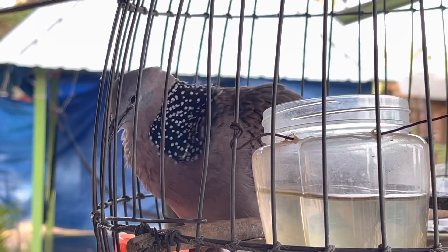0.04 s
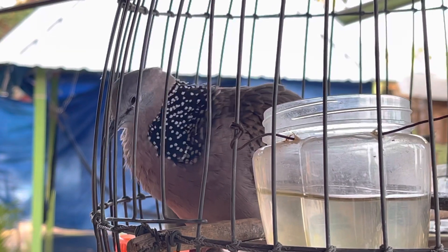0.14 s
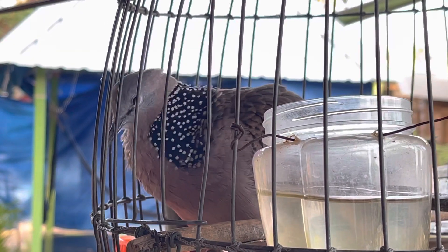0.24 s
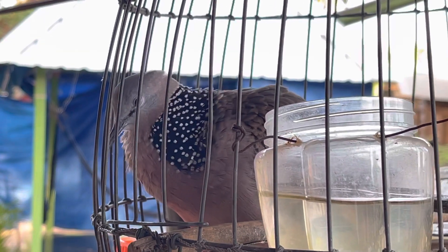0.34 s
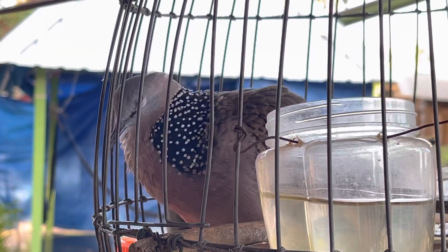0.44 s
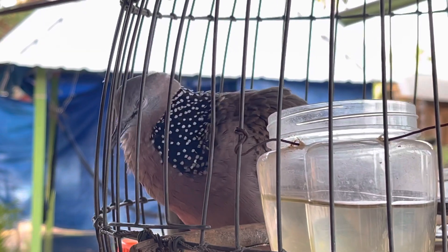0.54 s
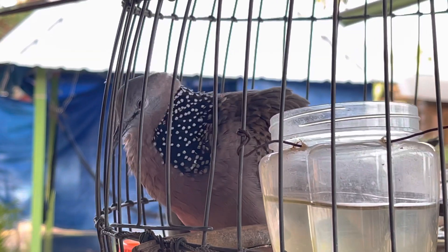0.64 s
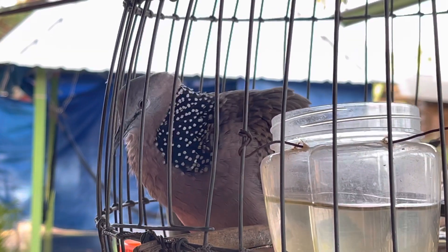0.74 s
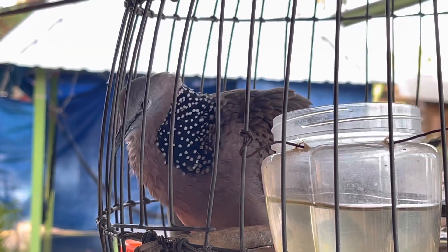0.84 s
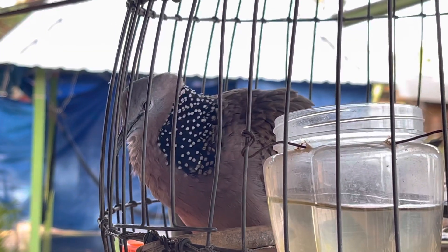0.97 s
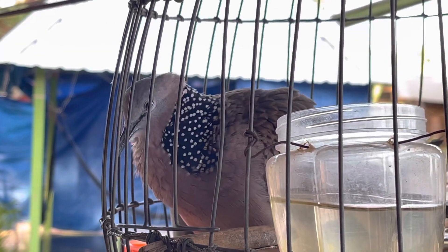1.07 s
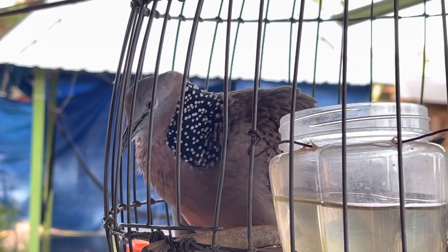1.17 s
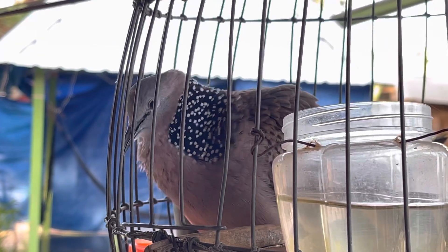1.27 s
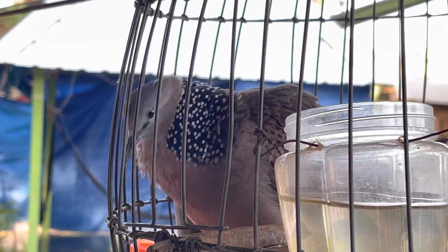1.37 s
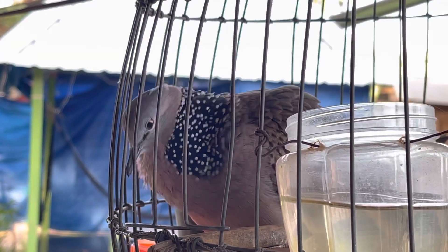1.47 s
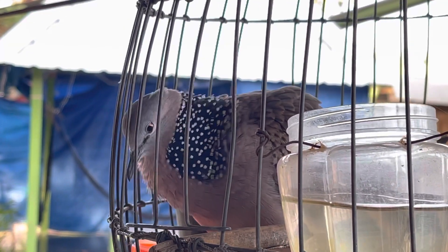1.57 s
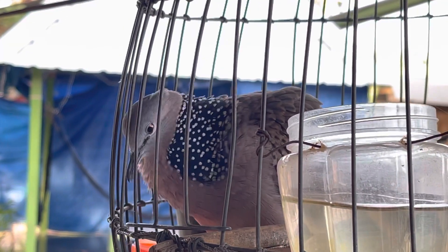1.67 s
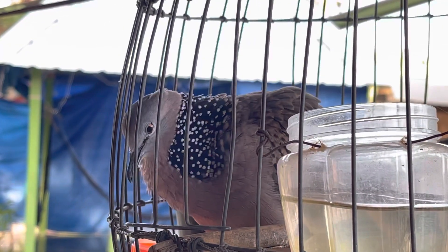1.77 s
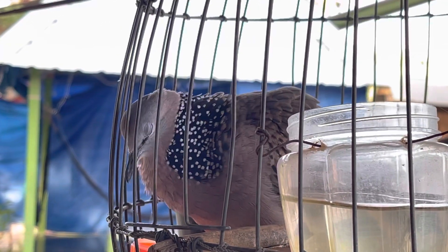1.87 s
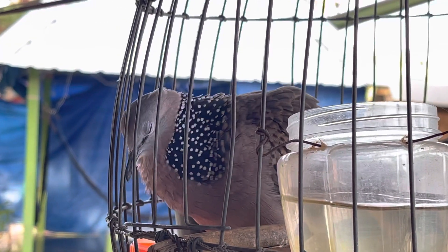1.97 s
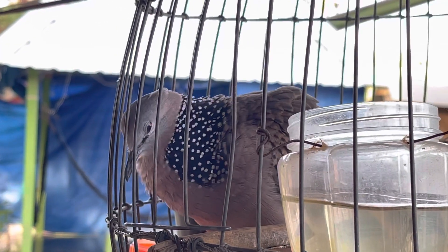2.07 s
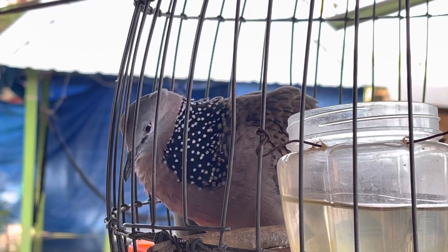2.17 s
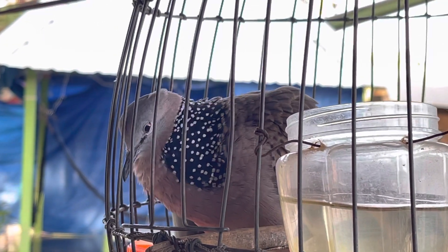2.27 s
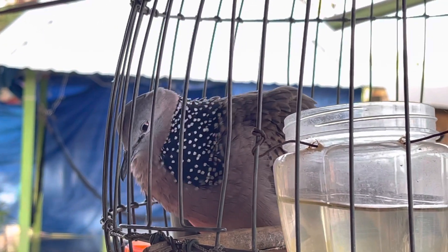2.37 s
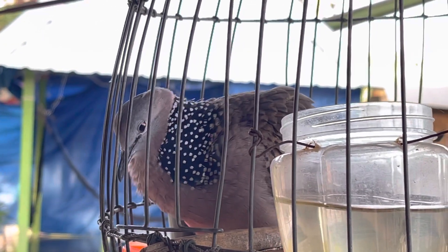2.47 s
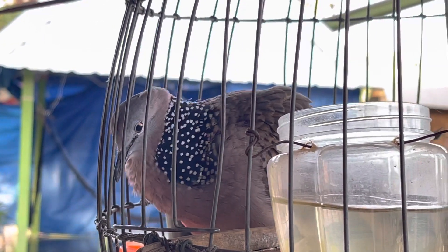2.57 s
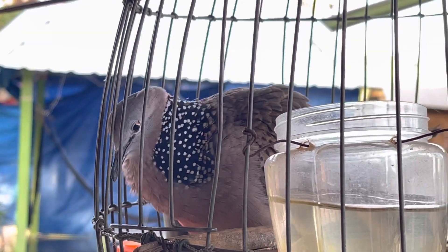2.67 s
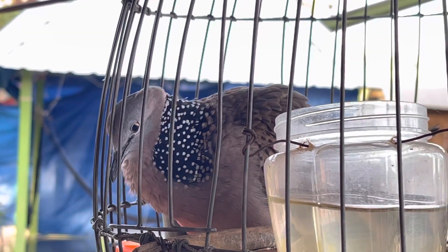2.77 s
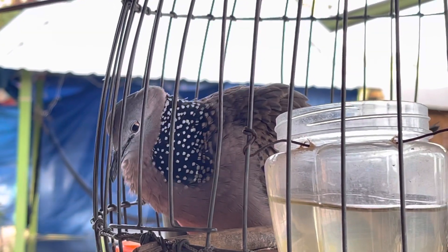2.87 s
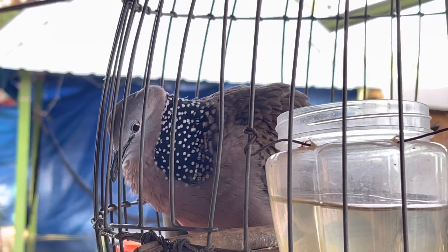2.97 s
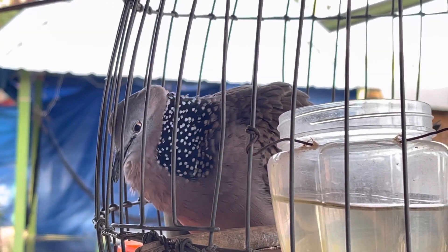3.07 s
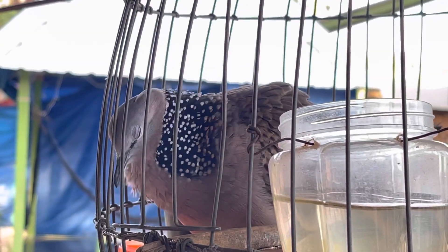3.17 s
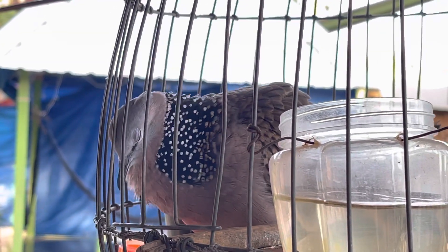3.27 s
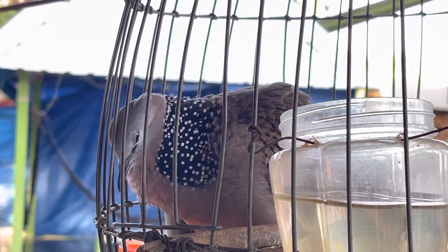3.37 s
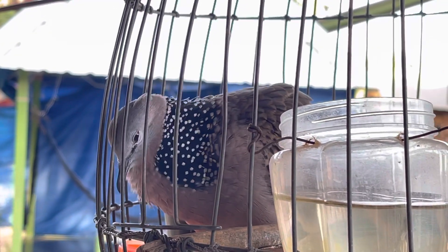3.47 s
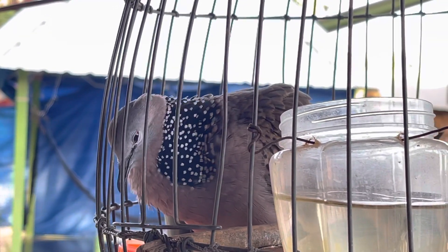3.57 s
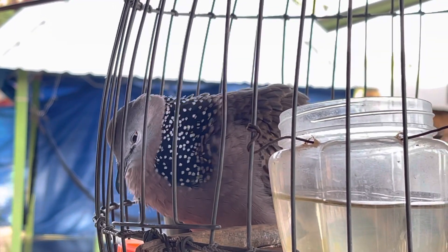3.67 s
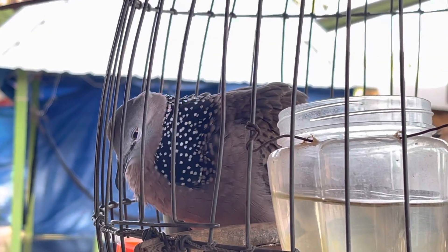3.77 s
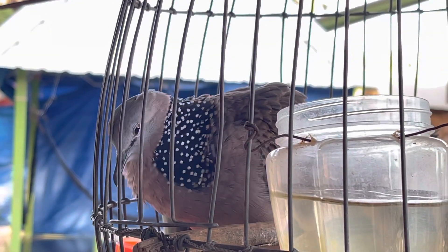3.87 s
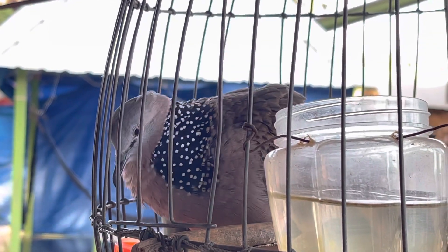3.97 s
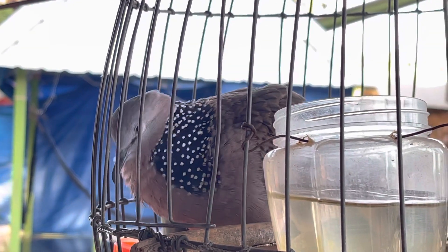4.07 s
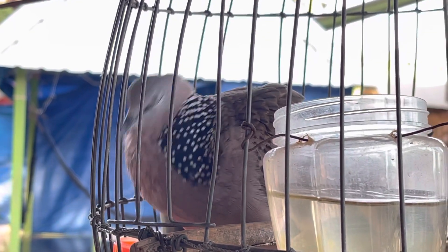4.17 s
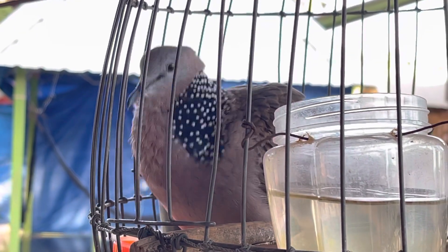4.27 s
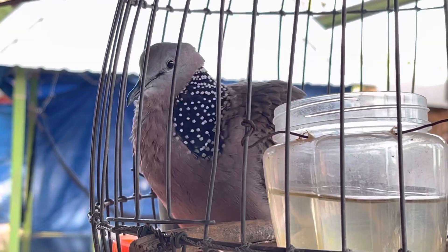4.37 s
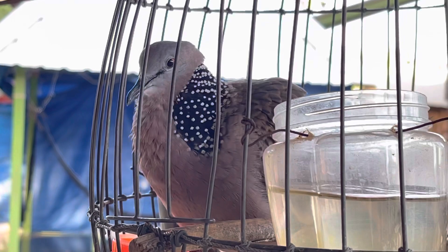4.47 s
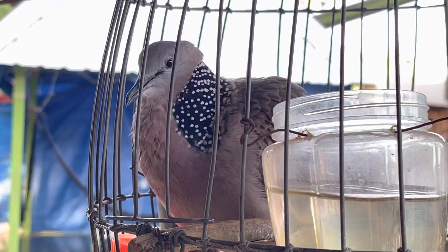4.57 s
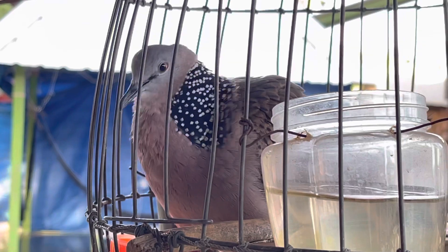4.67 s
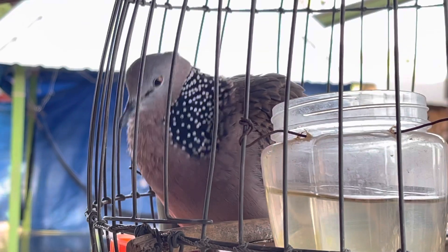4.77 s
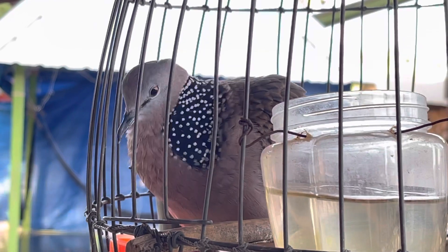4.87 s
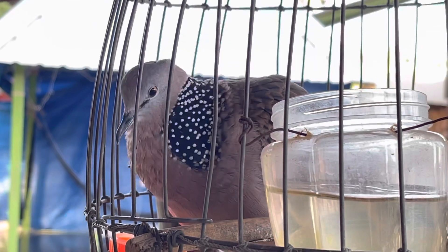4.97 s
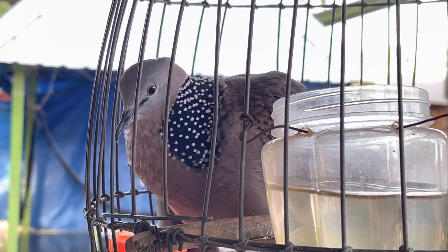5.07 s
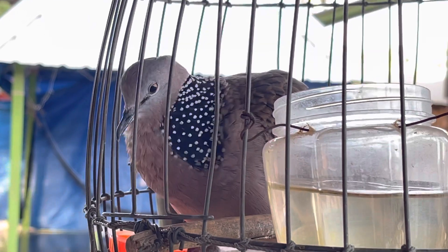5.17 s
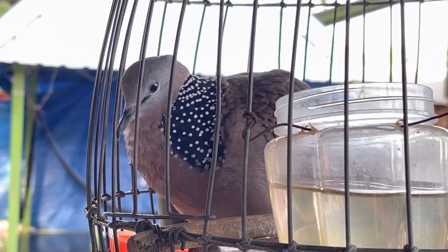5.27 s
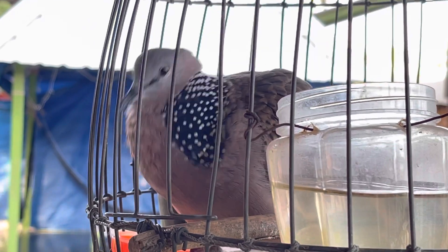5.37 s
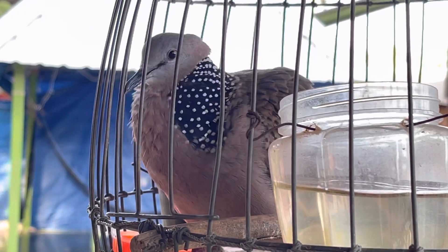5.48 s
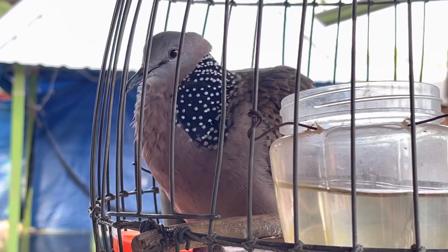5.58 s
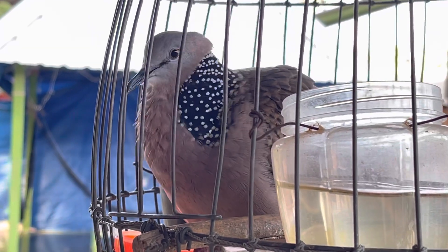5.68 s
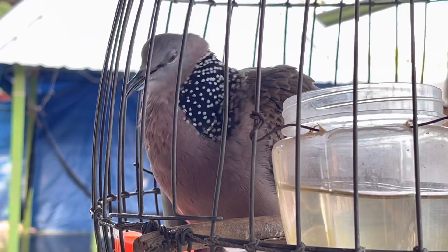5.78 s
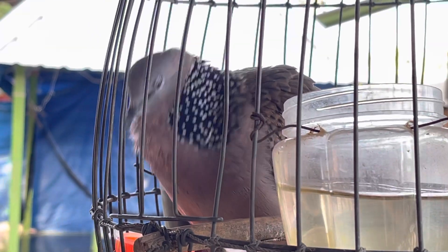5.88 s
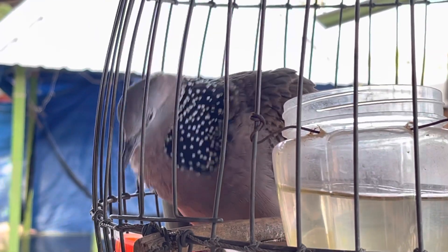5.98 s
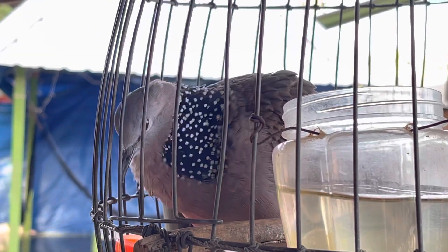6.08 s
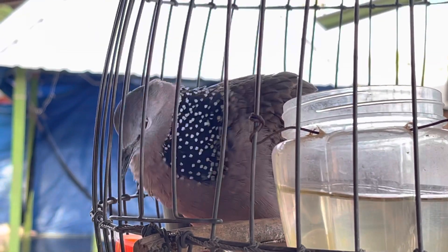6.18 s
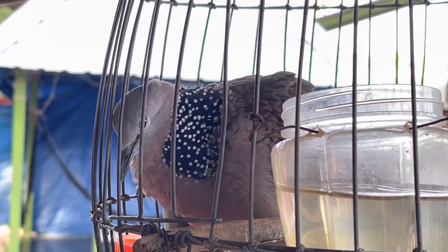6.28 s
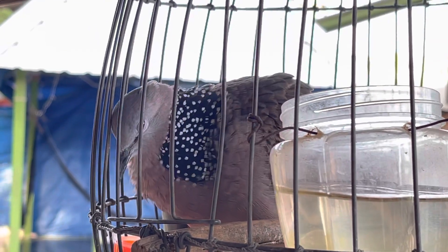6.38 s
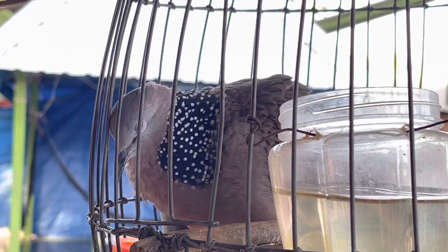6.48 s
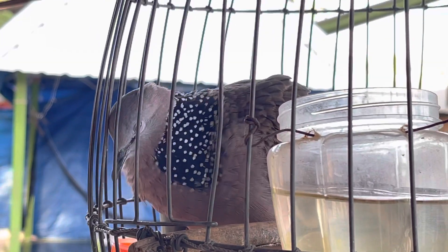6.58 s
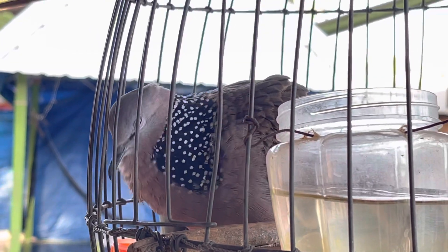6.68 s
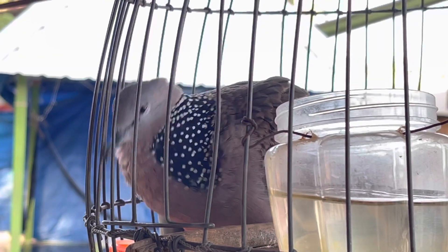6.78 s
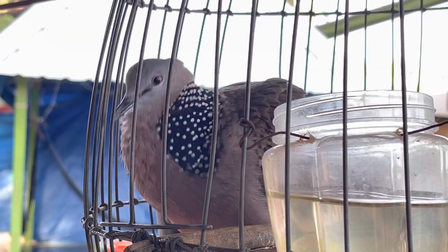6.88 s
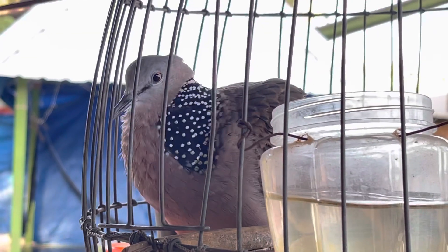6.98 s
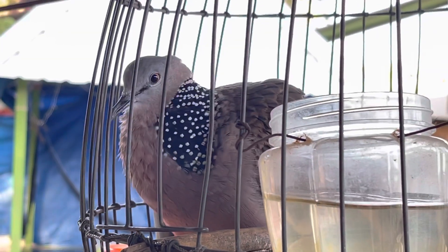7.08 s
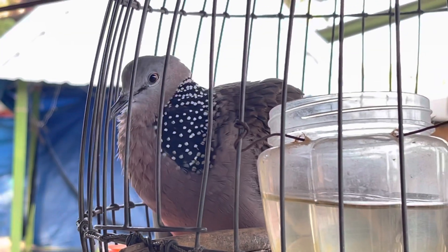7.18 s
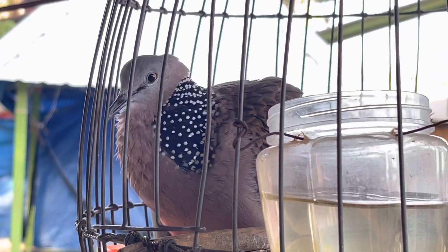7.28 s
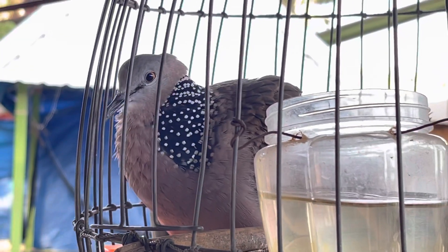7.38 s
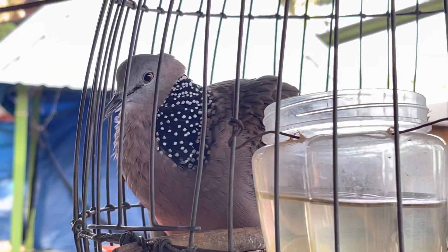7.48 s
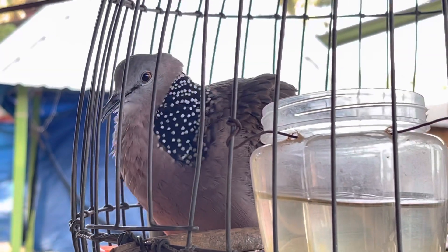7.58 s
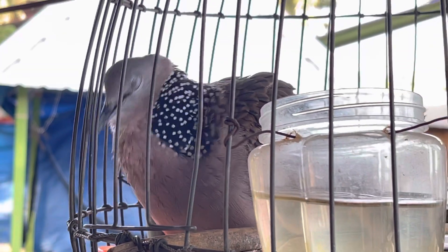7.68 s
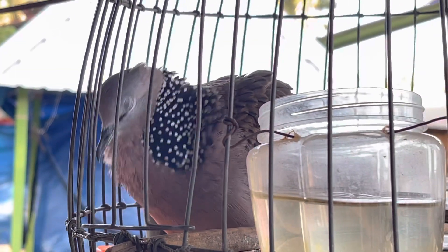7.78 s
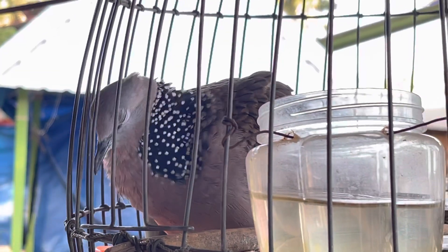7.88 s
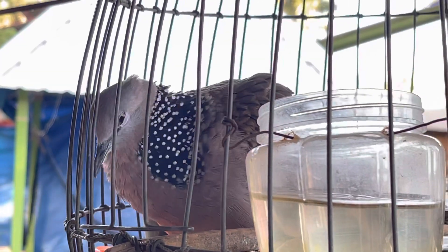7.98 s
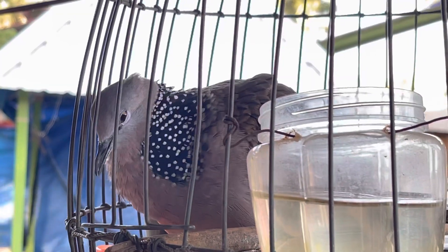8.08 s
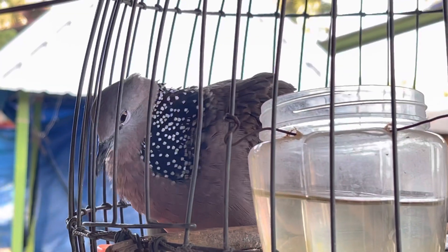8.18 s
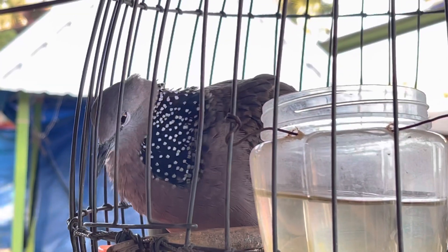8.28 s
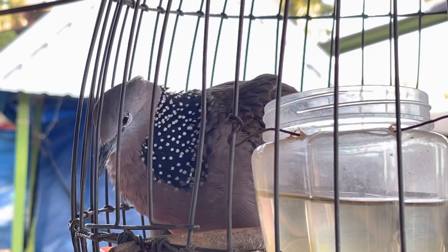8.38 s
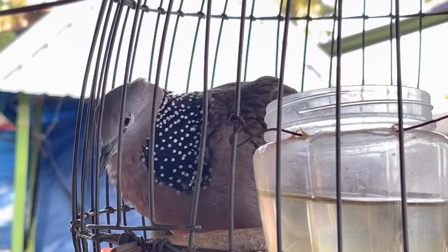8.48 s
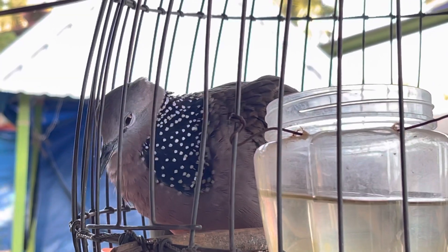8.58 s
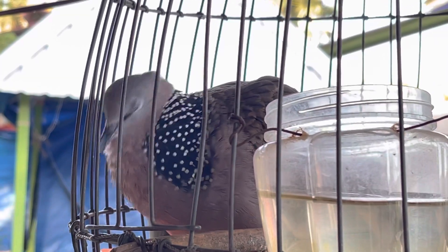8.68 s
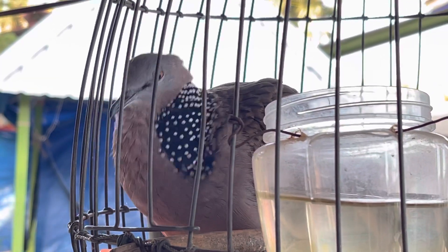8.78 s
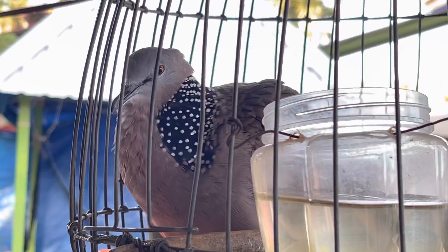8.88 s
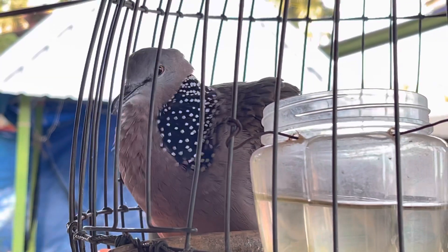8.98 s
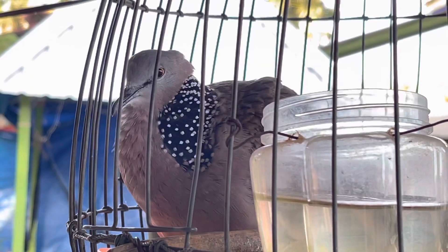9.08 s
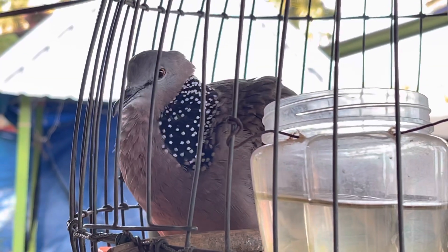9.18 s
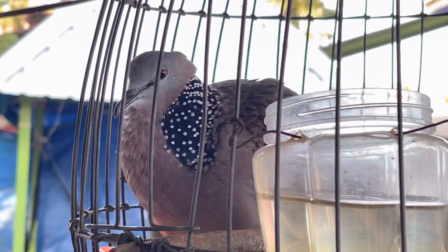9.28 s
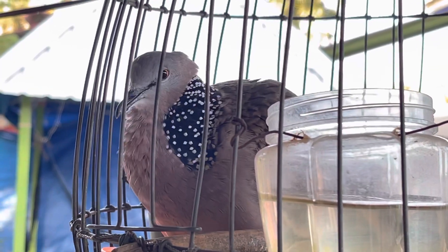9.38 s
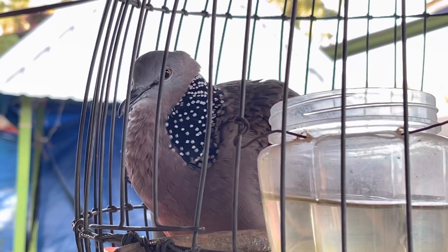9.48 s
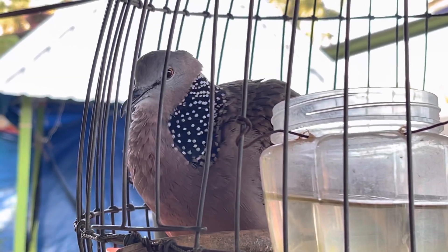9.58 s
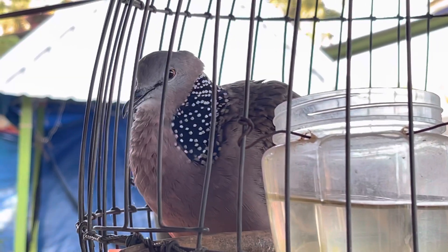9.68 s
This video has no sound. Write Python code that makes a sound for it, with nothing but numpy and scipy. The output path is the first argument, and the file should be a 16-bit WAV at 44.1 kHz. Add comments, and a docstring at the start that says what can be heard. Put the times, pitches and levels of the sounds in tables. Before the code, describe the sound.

A spotted dove coos very close: a short double coo with a purring dip, then a longer rolled coo, repeated with brief gaps for nearly ten seconds. At the start a second dove overlaps from further away, slightly higher and more echoing. A small bird tweets faintly mid-way. Soft air and a low distant engine lie beneath, in an open yard shelter.

```python
"""A caged spotted dove coos six phrases close to the microphone, under an open shelter.
Its syrinx sings a near sine that catches in quick rolls; the inflated crop rings at each catch.
A second dove answers further off, made the same way; small birds chirp and a distant dove coos in plain sines.
An engine idles far away as a few low orders; filtered noise makes the air, soft rustles and low bumps."""
import sys
import numpy as np
from scipy import signal
from scipy.fft import rfft, irfft, next_fast_len
from scipy.io import wavfile
from scipy.ndimage import uniform_filter1d

SR = 44100
rng = np.random.default_rng(int(sys.argv[2]) if len(sys.argv) > 2 else 0)


def dump_mix(stems):
    """Bounce the given channels to the path in sys.argv[1] as a 16-bit WAV at rate SR."""
    frames = np.atleast_2d(stems).T  # one column per channel
    limited = np.clip(frames, -1, 1)  # hard clip at full scale
    pcm = np.round(limited * 32767).astype(np.int16)
    wavfile.write(sys.argv[1], SR, pcm)


N = 429534
TIME = np.arange(N) / SR

# every near coo scoops up from a low pitch and drops again as the air is shut off
ONSET_HZ, RISE_S = 428.6, 0.019
CLOSING_HZ, FALL_S = 465.6, 0.012
# a long coo sags ever faster; its roll starts once the pitch is up
SAG_POWER, ROLL_DELAY_S = 3.3, .035
# double coo: the first swell peaks after the start, the second before the end; the purr clears near the end
FIRST_PEAK_S, FIRST_WIDTH_S = .039, .027
SECOND_PEAK_S, SECOND_WIDTH_S, CLEAR_S = .035, .056, .048
# the harder a catch, the likelier that the next one is missed (chance per cycle lost)
MISS_CHANCE = .09
# resonance of the crop, then the cutoff of the neck skin
CROP_HZ, CROP_WIDTH_HZ, SKIN_HZ = 590, 108, 744
# where the doves sit: left minus right in dB, and the phase by which the left ear leads in radians
NEAR_PAN_DB, NEAR_LEAD = 0.97, .28
FAR_PAN_DB, FAR_LEAD = 2.5, 1.1
# gain into the echoes, from the shelter and from the wall
NEAR_ROOM_DB, FAR_ROOM_DB, BIRDS_ROOM_DB = -27, -6.5, -4.5
NEAR_WALL_DB, FAR_WALL_DB = -40.5, -20


def undb(db):
    """Decibels to gain."""
    return 10 ** (np.asarray(db) / 20)


def level(x, db):
    """Set the rms level over the whole scene."""
    return x * undb(db) / np.sqrt(np.mean(x ** 2))


def noise():
    """White noise."""
    return rng.standard_normal(N)


def resonate(x, hz, width_hz):
    """One resonance with gain 1 at its centre."""
    b, a = signal.iirpeak(hz, hz / min(width_hz, SR / 3), fs=SR)
    return signal.lfilter(b, a, x + 1e-18)


def resonate_twice(x, hz, width_hz):
    """Two equal resonances in a row, for steeper skirts."""
    return resonate(resonate(x, hz, width_hz), hz, width_hz)


def lowpass(x, hz, order=2):
    """Smooth low-pass."""
    return signal.sosfilt(signal.butter(order, hz, fs=SR, output="sos"), x + 1e-18)


def colour(x, points):
    """Filter by a curve of (frequency [Hz], gain [dB]) points."""
    hz, db = np.transpose(points)
    size = next_fast_len(N)
    bins = np.maximum(np.fft.rfftfreq(size, 1 / SR), 1)
    gain = undb(np.interp(np.log(bins), np.log(hz), db))
    return irfft(rfft(x, size) * gain, size)[:N]


def walk(rate):
    """Random wander with a spread near 1: straight lines between `rate` random points per second."""
    return np.interp(TIME * rate, np.arange(8192), rng.standard_normal(8192))


def bell(x):
    """A smooth swell, 1 at zero."""
    return np.exp(-np.minimum(x ** 2, 50))


def burst(start, attack, decay):
    """Quick rise and exponential fall."""
    age = np.maximum(TIME - start, 0)
    return np.minimum(age / attack, 1) * np.exp(-np.minimum(age / decay, 20))


def pan(x, db):
    """Place a sound, left minus right in dB."""
    return x * undb(np.array([[db], [-db]]) / 2)


def place(x, db, lead):
    """Pan a sound and let it reach the left ear a little ahead in phase."""
    turn = np.exp(.5j * lead * np.array([[1], [-1]]))
    turned = signal.hilbert(x, next_fast_len(N))[:N] * turn
    return pan(turned.real, db)


def shelter(x, t60=.6, build_up_s=.025):
    """Diffuse echo of the roof and yard: decaying noise tails, partly alike in both ears."""
    t = np.arange(SR) / SR
    envelope = np.exp(-np.log(1000) * t / t60) * np.minimum(t / build_up_s, 1) ** 2
    mid, side = rng.standard_normal((2, SR)) * envelope
    tails = np.array([mid + .5 * side, mid - .5 * side])
    tails /= np.sqrt(np.sum(tails ** 2) / 2)
    return signal.fftconvolve(x[None], tails, axes=1)[:, :N]


def wall_echo(x, delay_s=0.15):
    """One late return from a wall across the yard."""
    return np.interp(TIME - delay_s, TIME, x, left=0)


def air(swell=0.96, flicker_db=3.0):
    """Outdoor air: low rumble under a wide hiss whose treble swells, sinks and flickers."""
    # course of the treble, used relative to its median and scaled by swell: (time [s], level [dB])
    hiss_course = [(0.0, -64.5), (0.21, -66), (0.48, -66.5), (1.3, -59), (3.46, -62.5), (3.62, -58.5),
                   (4.0, -63.5), (6.32, -68.5), (6.51, -65.5), (6.67, -68), (7.56, -63.5), (7.75, -59.5),
                   (7.94, -58.5), (9.7, -66.5)]
    # spectrum of the air before its level is set: (frequency [Hz], relative level [dB])
    air_curve = [(110, -21.5), (200, -7), (300, -8), (600, -11), (1300, -18.5), (2500, -20.5),
                 (4000, -25.5), (6300, -26.5), (8800, -19.5), (11400, -25.5), (13000, -49)]
    # spectrum of the rumble before its level is set: (frequency [Hz], relative level [dB])
    rumble_curve = [(20, -37), (38, -6), (55, -0.5), (85, 0.5), (130, -7), (240, -22), (500, -63.5)]
    # course of the rumble, around which it wanders: (time [s], level [dB])
    rumble_course = [(0, -50), (6.7, -49.5), (7.2, -45), (7.5, -53.5), (8.3, -52), (9.7, -48)]
    # width of the air: (frequency [Hz], side minus mid [dB])
    width_curve = [(200, -9), (600, -5), (1100, 4), (2200, -5), (4500, -11), (6500, -23.5), (8500, -13),
                   (9800, 12.5), (11500, -15.5)]

    s, db = np.transpose(hiss_course)
    gain = undb(swell * (np.interp(TIME, s, db) - np.median(db)) - 0.8 + flicker_db * walk(16))
    mid, other = (level(colour(noise(), air_curve), -56) for _ in range(2))
    low, other_low = (colour(v, [(1200, -0.5), (3000, -16.0)]) for v in (mid, other))
    treble = (mid - low) * gain
    # treble reaches the two ports out of phase; lower sounds come from all around
    quarter_turned = np.imag(signal.hilbert(treble, next_fast_len(N)))[:N]
    side = colour(other_low + quarter_turned, width_curve)
    heave = undb(np.interp(TIME, *np.transpose(rumble_course)) + 1.2 * walk(4.5))
    rumble, rumble_side = (heave * level(colour(noise(), rumble_curve), 0) for _ in range(2))
    side = side + undb(-12) * rumble_side
    return low + treble + rumble + np.array([side, -side])


def engine(unsteady_db=2):
    """Only the low orders of a slow idle carry this far, each wandering in level."""
    # idling engine: (time [s], base rate [1/s], level [dB])
    idle = [(0, 18.9, -44.5), (.8, 18.7, -51.5), (2.001, 19, -44.5), (2.801, 18.5, -47.5),
            (4.101, 18.3, -48.5), (4.702, 18, -54), (9.701, 16, -61)]
    # its exhaust orders: (multiple of the base rate, relative level [dB])
    exhaust = [(2, -13), (3, -19), (4, -7), (5, 0), (6, -5), (7, -6), (8, -15), (9, -16.5)]

    s, rate, db = np.transpose(idle)
    turn = np.cumsum(np.interp(TIME, s, rate)) / SR
    hum = np.zeros(N)
    for k, order_db in exhaust:
        strength = undb(order_db + unsteady_db * walk(7.1))
        hum += strength * np.sin(2 * np.pi * (np.round(k) * turn + rng.random()))
    return level(hum, 0) * undb(np.interp(TIME, s, db))


def bumps(width_hz=75, decay_s=0.051):
    """Dull, quickly damped thuds on the microphone, cut from low resonant noise."""
    # low bumps: (time [s], centre [Hz], noise level before the envelope [dB])
    thuds = [(6.972, 68, -43), (7.234, 72.5, -38), (8.433, 97.3, -36), (8.864, 113, -38.5),
             (8.959, 104, -37.5), (9.029, 106, -39), (9.329, 100, -42)]
    push, out = noise(), np.zeros(N)
    for start, hz, db in thuds:
        thud = resonate(resonate(push, hz, width_hz), hz, 2 * width_hz)
        out += level(thud, db) * burst(start, 0.0083, decay_s)
    return out


def rustles(grain_db=2):
    """Short grainy brushes: band-passed noise with a quick rise and a decay."""
    # soft rustles: (time [s], decay [s], centre [Hz], width of each filter pass [Hz],
    # noise level before the envelope [dB])
    brushes = [(.805, 0.068, 9000, 6000, -47), (0.811, 0.063, 3000, 5140, -49.5),
               (2.844, 0.053, 2400, 1802, -46.5), (3.401, .17, 2400, 3020, -49.5),
               (4.67, 0.69, 1995, 1582, -60), (5.86, 0.14, 3360, 3645, -58), (7.05, 0.09, 5000, 6930, -59)]
    grains, out = noise() * undb(grain_db * walk(270)), np.zeros(N)
    for start, decay, hz, width, db in brushes:
        out += level(resonate_twice(grains, hz, width), db) * burst(start, 0.0045, decay)
    return out


def other_birds(warble=0.015):
    """Thin sine notes: tweets that sweep up and level off, gliding or held whistles, two distant coos."""
    # a small bird repeats one upward tweet: (time [s], length [s], peak level [dB])
    tweets = [(5.62, .05, -60.5), (5.866, 0.057, -52.5), (6.11, 0.057, -57), (6.352, .075, -59.5),
              (6.594, 0.072, -60)]
    # stray whistles, and at the end two faint coos of a distant dove:
    # (time [s], length [s], start pitch [Hz], end pitch [Hz], peak level [dB])
    glides = [ (0.119, .2, 9300, 8200, -65), (1.224, .44, 1436, 1420, -62), (4.229, 0.054, 3600, 3760, -69),
              (5.352, .11, 2580, 2580, -62.5), (5.8, .33, 1484, 1522, -61.5), (7.21, .22, 1703, 1712, -66),
              (6.764, 0.047, 5450, 4430, -66), (8.806, .067, 6580, 7150, -61),
              (8.998, 0.086, 7200, 6850, -64), (9.204, 0.26, 584, 571, -57), (9.562, 0.24, 580, 585, -55)]
    from_hz, to_hz, rise_s = 1950, 2630, .018  # the tweet's sweep

    notes = []
    for start, length, db in tweets:
        age = np.arange(int(length * SR)) / SR
        notes.append((start, to_hz + (from_hz - to_hz) * bell(age / rise_s), db))
    for start, length, start_hz, end_hz, db in glides:
        notes.append((start, np.linspace(start_hz, end_hz, int(length * SR)), db))

    out, wobble = np.zeros(N), 1 + warble * walk(270)
    for start, hz, db in notes:
        span = np.minimum(int(start * SR) + np.arange(len(hz)), N - 1)
        arch = np.sqrt(np.abs(np.sin(np.linspace(0, np.pi, len(hz)))))
        phase = 2 * np.pi * np.cumsum(hz * wobble[span]) / SR
        out[span] += undb(db) * arch * np.sin(phase)
    return out


def catches(rolls, pitch, law):
    """Each catch briefly slackens the syrinx: returns the pitch sag in Hz and the choking of the tone."""
    spread_s, jitter, scatter, rebound = .0023, .11, .24, .17
    law_hz, rates, slips = np.transpose(law)
    sag, choke = np.zeros(N), np.zeros(N)
    for due, end in rolls:
        for late, more, luck in zip(*rng.standard_normal((2, 64)), rng.random(64)):
            if due >= end:
                break
            rate, slip = (np.interp(pitch[int(due * SR)], law_hz, v) for v in (rates, slips))
            at = due + jitter * late / rate
            near = slice(int(at * SR) - 700, int(at * SR) + 700)
            u = (TIME[near] - at) / spread_s
            slack = np.exp(-.5 * u ** 2)
            lost = slip * np.exp(scatter * more)  # cycles
            sag[near] += lost * slack / (spread_s * np.sqrt(2 * np.pi))
            # the dammed air pushes harder just after the catch
            choke[near] += np.sqrt(lost) * (slack ** 2 - rebound * np.exp(-.5 * (u - 2) ** 2))
            missed = luck < MISS_CHANCE * lost
            due += (2 if missed else 1) / rate
    return sag, choke


def dove(coos, rolls, roll_law, effort, edge_s=0.00053, waver=0.0058, husk_db=-46.5, hiss_db=-64):
    """A near sine from the syrinx, sung with closed beak through the crop and the skin of the neck."""
    # faint overtones that leak past the crop: (multiple of the pitch, level against the syrinx [dB])
    leaks = [(2, -51), (3, -59), (4, -65), (7, -66), (8, -59.5), (9, -58), (13, -68)]

    times, pitches, levels = np.hstack(coos)
    pitch, strength_db = np.interp(TIME, times, pitches), np.interp(TIME, times, levels)
    sounding = sum((TIME >= s[0]) & (TIME <= s[-1]) for s, _, _ in coos)
    gate = uniform_filter1d(sounding * 1., int(edge_s * SR))
    sag, choke = catches(rolls, pitch, roll_law)
    force = undb(strength_db + np.interp(pitch, *np.transpose(effort))) * gate
    swing = force * np.exp(-2 * choke)
    phase = 2 * np.pi * np.cumsum(pitch * (1 + waver * walk(180)) - sag) / SR
    crop = resonate(swing * np.sin(phase), CROP_HZ, CROP_WIDTH_HZ)
    tone = lowpass(crop, SKIN_HZ, order=6)
    # overtones only appear at the top of the range, where the membranes are driven hard
    strain = np.clip((pitch - 610) / 60, 0, 1)
    overtones = strain * swing * sum(undb(db) * np.sin(np.round(k) * phase) for k, db in leaks)
    # a husky breath puffs up around each catch
    husk = level(resonate_twice(noise(), 1000, 220), husk_db) * force * (0.6 + 1.2 * np.abs(choke))
    # a trace of hiss goes with the voice
    hiss = level(resonate_twice(noise(), 4300, 4000), hiss_db) * force
    return tone + overtones + husk + hiss


def far_song():
    """The further dove's coos, with no level offsets between them, and its rolls."""
    # one table per coo: (time [s], pitch [Hz])
    answers = [
        [(0, 780), (.07, 743), (.35, 736.3), (.73, 696), (.8, 603), (.87, 490)],
        [(1.06, 462), (1.1, 635), (1.13, 734), (1.2, 723), (1.25, 602), (1.295, 426)],
    ]
    # its rolls; one whose end is not after its start holds no catch: (start [s], end [s])
    answer_rolls = [(0.101, 0.74), (1.091, 1.09), (1.22, 1.28)]
    return [(*np.transpose(coo), np.zeros(len(coo))) for coo in answers], answer_rolls


def scoop(held_hz, age, length):
    """Pitch rises into the coo and falls out of it."""
    hz = held_hz + (ONSET_HZ - held_hz) * bell(age / RISE_S)
    return CLOSING_HZ + (hz - CLOSING_HZ) * np.minimum((length - age) / FALL_S, 1)


def near_song():
    """The near dove's coos as (times, pitches, levels), and its rolls as (start, end)."""
    # long coos open with a roll, clear, and relapse once; roll times count from the coo's start:
    # (time [s], length [s], top pitch [Hz], sag by the end [Hz], roll end [s], relapse start [s],
    # relapse length [s], level offset [dB])
    long_coos = [ (.053, .376, 697, 42.15, 0.25, .275, .058, 1.0),
                 (1.786, 0.41, 695.8, 49.8, 0.14, 0.24, .005, 0.56),
                 (3.602, 0.4, 689.6, 55.05, 0.24, 0.29, .02, -0.2),
                 (4.969, 0.28, 668.8, 149, 0.1, 0.15, .115, 0.7),
                 (6.287, .404, 691.8, 55.6, .207, .257, .066, -0.17),
                 (8.135, 0.42, 688.5, 49.56, 0.23, 0.32, .005, -0.2)]
    # double coos, two swells joined by a low purr; the roll time counts from the coo's start:
    # (time [s], length [s], first swell [Hz], purr [Hz], second swell [Hz], roll start [s],
    # level offset [dB])
    double_coos = [ (1.304, .275, 645.8, 450, 652.6, .043, 0.25),
                   (3.117, 0.28, 663, 445, 657.4, 0.057, 0.76), (4.661, 0.2, 672.3, 600, 658.4, 0.045, 0),
                   (5.792, .285, 635, 450, 648, .031, 0.74), (7.655, 0.28, 620.6, 452, 665, .036, 0.5)]

    coos, rolls = [], []
    for start, length, top_hz, sag_hz, roll_end, relapse, relapse_length, db in long_coos:
        age = np.linspace(0, length, 256)
        held_hz = top_hz - sag_hz * (age / length) ** SAG_POWER
        coos.append((start + age, scoop(held_hz, age, length), np.full_like(age, db)))
        rolls.append((start + ROLL_DELAY_S, start + roll_end))
        rolls.append((start + relapse, start + relapse + relapse_length))
    for start, length, first_hz, purr_hz, second_hz, roll_start, db in double_coos:
        age = np.linspace(0, length, 256)
        first = (first_hz - purr_hz) * bell((age - FIRST_PEAK_S) / FIRST_WIDTH_S)
        second = (second_hz - purr_hz) * bell((length - age - SECOND_PEAK_S) / SECOND_WIDTH_S)
        coos.append((start + age, scoop(purr_hz + first + second, age, length), np.full_like(age, db)))
        rolls.append((start + roll_start, start + length - CLEAR_S))
    return sorted(coos, key=lambda coo: coo[0][0]), rolls


def scene():
    """The near dove, its neighbours and the yard."""
    # air pressure drives pitch and level together: (pitch [Hz], syrinx level before the crop [dB])
    near_effort = [(420, -21.5), (490, -13), (545, -13.5), (600, -7.5), (690, -7.5)]
    far_effort = [(460, -34), (600, -33), (720, -23.5), (775, -15.5)]
    # in a roll the syrinx keeps catching, harder at high pitch:
    # (pitch [Hz], catch rate [1/s], typical phase lost at each [cycles])
    near_roll = [(458, 81, 0.27), (597, 120, .46), (692.3, 67, 0.8)]
    far_roll = [(595, 140, .5), (743, 44, .9)]

    near = dove(*near_song(), near_roll, near_effort)
    far = dove(*far_song(), far_roll, far_effort)
    birds = other_birds()
    doves = place(near, NEAR_PAN_DB, NEAR_LEAD) + place(far, FAR_PAN_DB, FAR_LEAD)
    direct = doves + pan(engine() + bumps(), -1) + birds + rustles()
    room = shelter(undb(NEAR_ROOM_DB) * near + undb(FAR_ROOM_DB) * far + undb(BIRDS_ROOM_DB) * birds)
    wall = wall_echo(undb(NEAR_WALL_DB) * near + undb(FAR_WALL_DB) * far)
    return direct + room + wall + air()


def record(dry):
    """The microphone has a narrow treble notch, and the top is cut steeply above 12300 Hz."""
    notched = dry - resonate(dry, 10220, 1600)
    return signal.sosfilt(signal.ellip(8, .2, 70, 12300, fs=SR, output="sos"), notched)


dry = scene()
out = record(dry)
dump_mix(out)
```